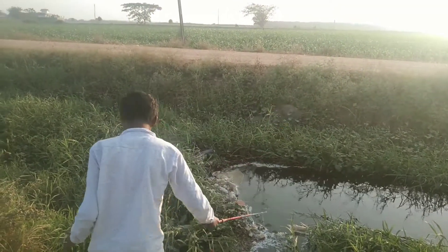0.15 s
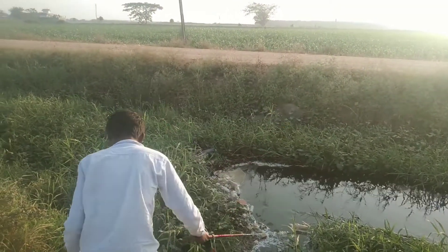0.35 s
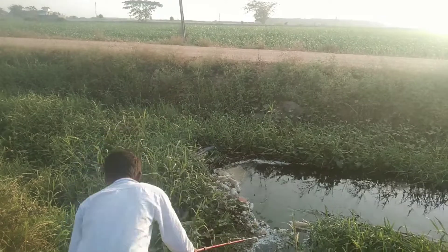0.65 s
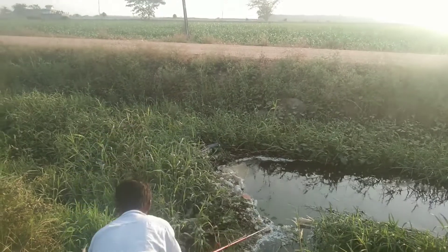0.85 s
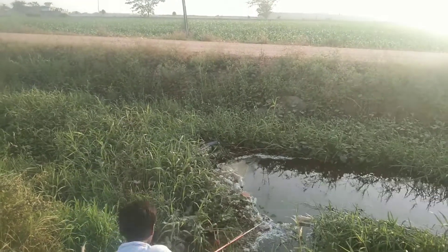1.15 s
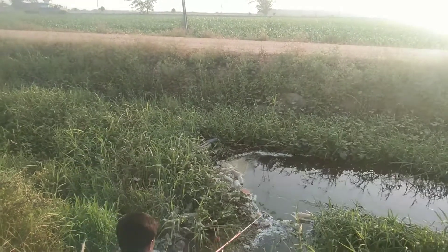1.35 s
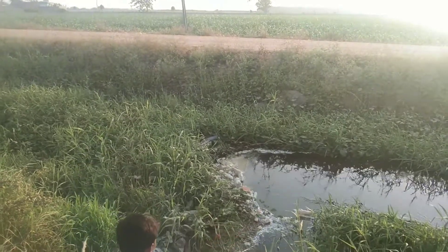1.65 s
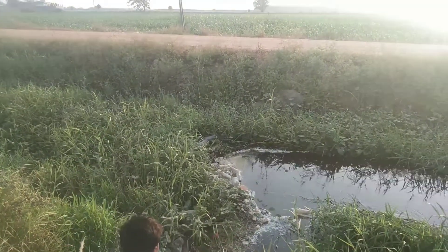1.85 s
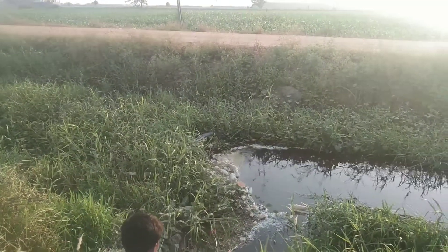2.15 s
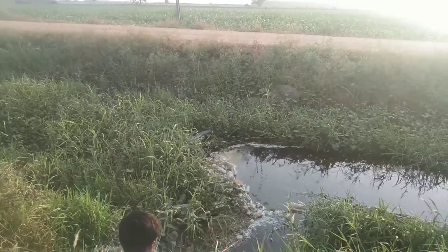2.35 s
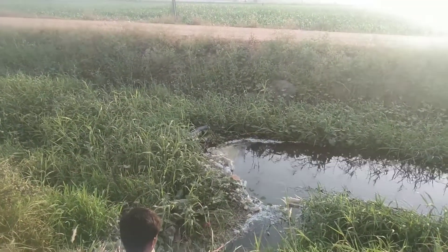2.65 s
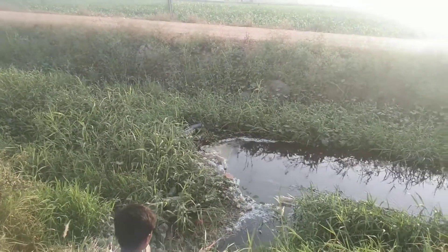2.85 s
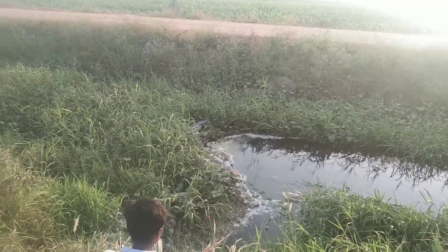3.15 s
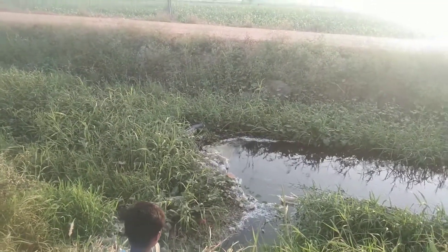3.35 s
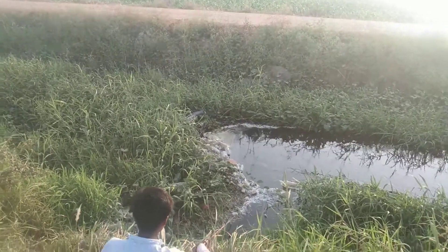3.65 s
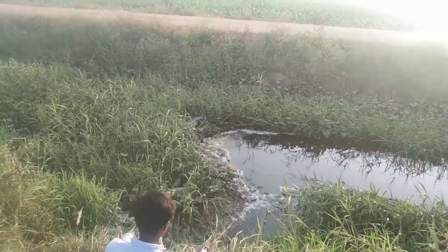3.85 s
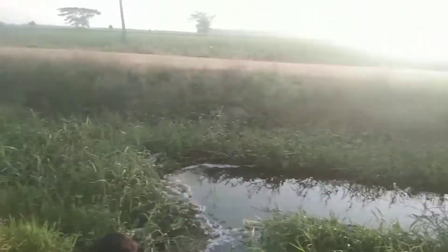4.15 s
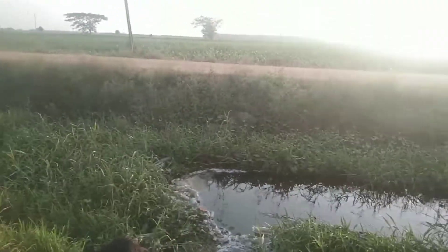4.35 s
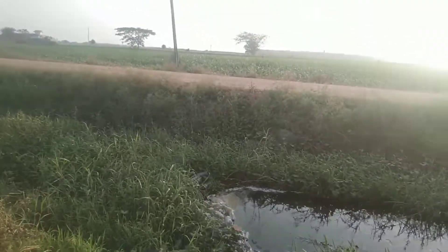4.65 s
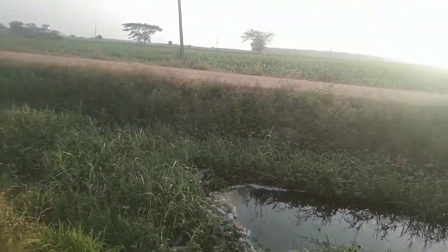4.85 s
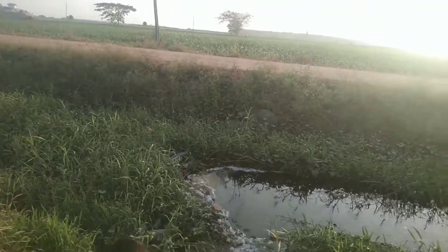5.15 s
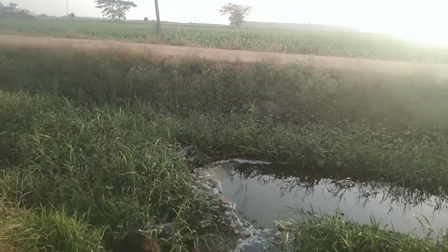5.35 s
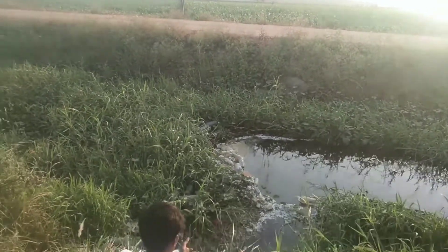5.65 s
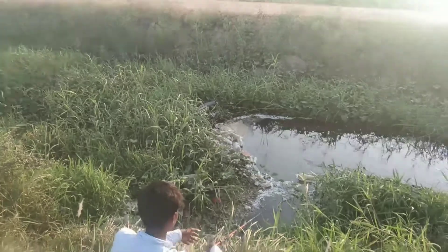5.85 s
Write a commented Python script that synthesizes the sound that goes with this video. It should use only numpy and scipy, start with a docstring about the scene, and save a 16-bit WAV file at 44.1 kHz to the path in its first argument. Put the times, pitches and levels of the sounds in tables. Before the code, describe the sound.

Close footsteps swish and crunch in long grass as a motorcycle putters into the distance, with insects trilling and water trickling.

```python
"""A single-cylinder motorcycle thumps away along a country road, slowly gathering speed as it fades.
Each firing booms in the silencer, rasps out of the pipe and sets metal parts ticking and ringing.
Close by, someone moves about on a grassy bank, brushing blades and snapping stalks; water trickles
into a pond, insects trill, a bird chirps. There are a few soft bumps, a faint metallic ding, and at
the end a double knock with a crunch of dry stalks."""
import sys
import numpy as np
from scipy import signal
from scipy.fft import rfft, irfft
from scipy.io import wavfile
from scipy.ndimage import uniform_filter1d

SR = 44100
rng = np.random.default_rng(int(sys.argv[2]) if len(sys.argv) > 2 else 0)


def transcribe(u):
    """Save the signal u as a 16-bit wav file named by the first command-line argument.

    u: samples, shape (n,) or (channels, n), limited to [-1, 1]; the rate is SR.
    q: integer samples, one column per channel.
    """
    v = np.clip(np.atleast_2d(u).T, -1, 1)
    q = np.round(v * 32767).astype(np.int16)
    wavfile.write(sys.argv[1], SR, q)


N = 264600
T = np.arange(N) / SR


def undb(db):
    """Decibels to gain."""
    return 10 ** (np.asarray(db) / 20)


def unit(x):
    """Scale to rms 1."""
    return x / np.sqrt(np.mean(x ** 2))


def curve(rows):
    """Join (seconds, value) rows by straight lines."""
    return np.interp(T, *np.transpose(rows))


def swell(s, rise_s, fall_s):
    """A rounded crest at s."""
    return np.exp(-.5 * np.minimum(abs(T - s) / np.where(T < s, rise_s, fall_s), 10) ** 2)


def noise():
    """White noise."""
    return rng.standard_normal(N)


def wander(rate_hz):
    """Smooth random drift; rms 1."""
    hold = int(SR / rate_hz)
    stairs = np.repeat(rng.standard_normal(N // hold + 1), hold)
    return unit(uniform_filter1d(uniform_filter1d(stairs, hold), hold)[:N])


def grains(per_s, size=N):
    """Dense tiny clicks of uneven size; rms 1."""
    return unit((rng.random(size) < per_s / SR) * rng.standard_normal(size))


def colour(x, points, tilt_db=0, low_hz=10):
    """Equalise by (Hz, dB) points, a tilt per octave and a low cut; rms 1."""
    f = np.maximum(np.fft.rfftfreq(len(x), 1 / SR), 1)
    hz, db = np.transpose(points)
    gain = undb(np.interp(np.log(f), np.log(hz), db) + tilt_db * np.log2(f))
    return unit(irfft(rfft(x) * gain / np.hypot(1, (low_hz / f) ** 3), len(x)))


def band(hz, width_hz, drive=1):
    """Noise, pushed by a drive, in one steep resonance; rms 1."""
    b, a = signal.iirpeak(hz, hz / width_hz / 1.5, fs=SR)
    return unit(signal.lfilter(b, a, signal.lfilter(b, a, noise() * drive)))


def ring(hz, decay_s, contact_s=1e-5):
    """A struck resonance; a longer contact rounds its attack."""
    t = T[:int(10 * decay_s * SR) + 2]
    return (1 - np.exp(-t / contact_s)) * np.exp(-t / decay_s) * np.sin(2 * np.pi * hz * t)


def add(out, s, sound):
    """Mix a sound in, starting at s."""
    i = max(int(s * SR), 0)
    out[i:i + len(sound)] += sound[:max(N - i, 0)]


def distance_db(absorb_db_per_m, nearest_s=-1.01, road_m=10.5, speed_m_s=8.3):
    """The bike's drop in level since its nearest point: spreading, and absorption along the ground."""
    metres = np.hypot(road_m, speed_m_s * (T - nearest_s))
    return -20 * np.log10(metres / road_m) - absorb_db_per_m * (metres - road_m)


def exhaust(fired, nearest_db=-30.5, scatter_db=1.0):
    """Each firing makes the silencer's chambers swell and ring for a few cycles."""
    # Silencer resonances. Each row: pitch in Hz, swell time constant in seconds, relative gain in dB.
    chambers = [(148, 0.0032, 10.5), (109.3, 0.0027, -37), (76, 0.0049, -5.5), (275, 0.0014, -6.5),
                (158.6, 0.011, -28)]
    t = T[:SR // 8]
    thump = sum(-undb(db) * (t / swell_s) ** 4 * np.exp(-t / swell_s) * np.sin(2 * np.pi * hz * t)
                for hz, swell_s, db in chambers)
    beats = signal.fftconvolve(fired * undb(scatter_db * noise()), thump)[:N]
    return unit(beats) * undb(nearest_db + distance_db(absorb_db_per_m=0.2344))


def clatter(cycle, level_db=-45.5, steady=0.42, rear_db=2.5, turn_s=0.63):
    """Gas rasps once a cycle over chain and tyre noise, carrying better as the pipe turns our way."""
    # Tone of the rasp. Each row: frequency in Hz, gain in dB.
    rasp_eq = [(200, 1.5), (350, 1), (580, -1), (740, 1), (900, -8), (1550, -25), (2300, -6.5),
               (3300, -13.5), (4400, -9.5), (6600, -9), (8500, -23.5), (12500, -40.5), (15000, -37)]
    lead, rise, fall = 0.011, 0.094, 0.19  # in engine cycles
    phase = (cycle + lead) % 1
    puffs = (1 - np.exp(-phase / rise)) * np.exp(-phase / fall) * undb(2 * wander(18))
    rasp = colour(grains(14000) * (steady + puffs), rasp_eq)
    facing_db = rear_db * (1 - 2 * np.exp(-T / turn_s))
    return rasp * undb(level_db + facing_db + distance_db(absorb_db_per_m=0.07))


def casing(cycle, lag_cycles=.1, decay_cycles=0.52):
    """Fins and covers are jolted once a cycle and ring on, each heard best from one angle."""
    # Ringing parts. Each row: pitch and width in Hz, level in dB, loudest moment and spread in seconds.
    parts = [(1165, 300, -56.5, 0.081, 0.71), (2670, 790, -56.5, 0.57, 0.39), (733, 26, -55.5, 0.57, 0.31),
             (1895, 184, -62, 1.63, 1.4), (2186, 67, -63.5, 2.53, 0.78), (560, 254, -59, 2.6, 2.08)]
    jolt = .25 + np.exp(-((cycle - lag_cycles) % 1) / decay_cycles)
    return sum(band(hz, width, jolt) * undb(db) * swell(s, spread, spread)
               for hz, width, db, s, spread in parts)


def cover_ping(fired, hz=2190, lag_s=.004, level_db=-52.0, uneven_db=6, loudest_s=2.2, spread_s=0.84):
    """One thin cover rings out cleanly on each firing, best heard from behind the bike."""
    out = np.zeros(N)
    for s in T[fired > 0]:
        detune, accent = rng.uniform(-1, 1, 2)
        ping = ring(hz * (1 + .025 * detune), decay_s=0.0085, contact_s=.002)
        add(out, s + lag_s, ping * undb(level_db + uneven_db * accent))
    return out * swell(loudest_s, spread_s, spread_s)


def valves(fired, start_db=-39.5, fade_db_per_s=11, uneven_db=4, ticks=7):
    """Uneven flurries of small metallic ticks with each firing, lost as the bike draws away."""
    out = np.zeros(N)
    for s in T[fired > 0]:
        force_db = start_db - fade_db_per_s * s + uneven_db * rng.uniform(-1, 1)
        for hz, lag_s, db in rng.uniform((2300, -.001, -6), (5200, .02, 4), (ticks, 3)):
            add(out, s + lag_s, ring(hz, decay_s=0.0014, contact_s=.00015) * undb(force_db + db))
    return out


def road_hiss(start_db=-72, fade_db_per_s=3.0):
    """The thin top of the tyre noise sinks steadily with distance."""
    hiss = colour(noise(), [(5000, -22), (8500, -2), (10500, 2), (12500, -5.0), (15000, -0.5)])
    return hiss * undb(start_db - fade_db_per_s * T)


def pondside(level_db=-55):
    """Trickling water and open air, with narrow bands of distant drone and insects."""
    # Tone of the water and air. Each row: frequency in Hz, gain in dB.
    bed_eq = [(25, -34), (70, 10.5), (110, 17), (220, 4.5), (420, -4), (700, 1), (950, -3), (1200, -1.5),
              (1900, -8), (3000, -13.5), (5000, -10.5), (7000, -19), (9300, -32), (12500, -56),
              (15000, -32)]
    # Steady drones. Each row: centre and width in Hz, level in dB.
    drones = [(737, 46, -64.5), (559, 117, -66.5), (1174, 100, -73.5), (1568, 210, -71), (7080, 200, -70.5)]
    bed = colour(grains(9000), bed_eq, low_hz=30) * undb(level_db + .5 * wander(5.7))
    return bed + sum(band(hz, width) * undb(db + 1.5 * wander(14)) for hz, width, db in drones)


def stirring(rest_db=-68):
    """How strongly the long grass is brushed, as a gain."""
    # Slow brushes. Each row: crest and spread in seconds, level in dB.
    brushes = [(.63, 0.087, -52.5), (1.68, 0.15, -61), (2.33, 0.067, -58.5), (2.95, 0.12, -63.5),
               (3.28, 0.052, -62), (3.8, 0.18, -56), (4.95, 0.17, -59), (5.47, 0.22, -58.5),
               (5.98, .08, -59)]
    power = sum((undb(db) * swell(s, spread, spread)) ** 2 for s, spread, db in brushes)
    return np.sqrt(undb(rest_db) ** 2 + power)


def grass_rustle(flutter_db=2.2):
    """Blades rub all the time in a fluttering hiss that lifts with each brush."""
    # Tone of rubbing blades. Each row: frequency in Hz, gain in dB.
    rub_eq = [(1000, -13), (3000, -1.5), (5000, 0), (6600, 12), (7400, 3), (9000, -16), (12500, -35),
              (15000, -23)]
    flutter = undb(flutter_db * wander(45))
    return colour(grains(6000), rub_eq) * stirring() * flutter


def grass_steps(fall_ratio=1.46, echo_s=.003, echo_db=-7):
    """Each step crushes a burst of blades; a close reflection hollows the swish a little."""
    # Steps and swishes. Each row: crest and rise in seconds, level in dB, tilt in dB per octave,
    # low cut in Hz.
    swishes = [(0.031, 0.074, -51.5, -6, 730), (.837, .018, -40, -3, 250), (0.887, 0.0076, -42, -2.5, 250),
               (.978, .011, -46.5, 2, 400), (1.024, .015, -43, -1.5, 400),
               (1.33, 0.00089, -41.5, -4.5, 1800), (1.668, 0.02, -46.5, -3, 300),
               (2.555, .022, -53, -2, 300), (3.695, 0.036, -49.5, -6, 400), (3.843, 0.023, -51, -5, 380),
               (4.31, .04, -57, -3, 500), (5.078, .0025, -47, -4, 1000), (5.116, 0.018, -40.5, -4.5, 1100),
               (5.898, .011, -39.5, -1.5, 297)]
    # Tone of crushed grass. Each row: frequency in Hz, gain in dB.
    crush_eq = [(150, -14.5), (450, 9), (800, 2.5), (1500, 2.5), (2400, 5), (3500, 1.5), (6600, 6),
                (7600, -4), (9000, -22), (12500, -29), (15000, -30)]
    steps = np.zeros(N)
    for s, rise_s, db, tilt_db, low_hz in swishes:
        near = abs(T - s) < .5
        burst = colour(grains(5000, size=near.sum()), crush_eq, tilt_db, low_hz)
        steps[near] += burst * swell(s, rise_s, rise_s * fall_ratio)[near] * undb(db)
    steps *= undb(1.8 * wander(220))  # the blades catch and slip
    return steps + undb(echo_db) * np.interp(T - echo_s, T, steps)


def crackle(per_s=70, above_rustle_db=6, uneven_db=5):
    """Small dry blades tick here and there, louder when the grass is stirred."""
    out, stir = np.zeros(N), stirring()
    for s, hz, accent in rng.uniform((0, 3200, -1), (T[-1], 7000, 1), (int(per_s * T[-1]), 3)):
        tick = ring(hz, decay_s=0.0017, contact_s=0.00033)
        add(out, s, tick * stir[int(s * SR)] * undb(above_rustle_db + uneven_db * accent))
    return out


def sizzle(start_s=0.51, end_s=0.72, level_db=-62):
    """A thin, very high hiss swells briefly."""
    envelope = curve([(start_s - .04, 0), (start_s + .05, 1), (end_s, 1), (end_s + .015, 0)])
    hiss = colour(noise(), [(5000, -20), (8000, -10), (10500, 8.5), (12500, -4), (15000, 4)])
    return hiss * envelope * undb(level_db)


def insects(chirp_depth=0.57, stroke_hz=125, fade_s=0.032):
    """Narrow, shrill trills of quick wing strokes, grouped into slightly uneven chirps."""
    # Songs. Each row: start and end in seconds, pitch and width in Hz, chirps per second, level in dB.
    songs = [(1.0, 2.454, 8600, 260, 6.9, -74.5), (1.607, 2.602, 6520, 480, 9, -58),
             (2.573, 4.8, 8090, 200, 5.5, -70), (3.077, 5.1, 7550, 350, 5.1, -69),
             (4.602, 5.906, 8010, 400, 4.3, -68.5), (4.3, 6, 7150, 220, 8, -66.5),
             (4.7, 5.804, 4420, 600, 13.6, -65)]
    out = np.zeros(N)
    for start, end, hz, width, rate, db in songs:
        loose_time = np.cumsum(1 + 0.1537 * wander(3.87)) / SR
        chirps = np.clip(0.77 + chirp_depth * np.sin(2 * np.pi * rate * loose_time), 0, 1)
        strokes = 1 + .7 * np.sin(2 * np.pi * stroke_hz * loose_time)
        singing = np.clip(np.minimum(T - start, end - T) / fade_s, 0, 1)
        out += band(hz, width) * chirps * strokes * singing * undb(db)
    return out


def stalk_snaps(decay_cycles=2):
    """Single stalks break underfoot, each with a tiny pitched click."""
    # Snaps. Each row: start in seconds, strength in dB, pitch in Hz.
    snaps = [(2.012, -43, 13500), (2.033, -41, 13500), (3.677, -43, 13000), (5.1206, -36, 3000),
             (5.143, -32, 2400), (5.228, -36.5, 1500), (5.8868, -19, 6140)]
    out = np.zeros(N)
    for s, db, hz in snaps:
        add(out, s, undb(db) * ring(hz, decay_cycles / hz, contact_s=.5 / hz))
    return out


def bird(s=2.538, spread_s=0.0048, level_db=-45):
    """One short rising chirp."""
    hz = curve([(s - spread_s, 3350), (s + spread_s / 2, 3780)])
    envelope = np.exp(-.5 * ((T - s) / spread_s) ** 2)
    return np.sin(2 * np.pi * np.cumsum(hz) / SR) * envelope * undb(level_db)


def knocks(click_db=-9, click_hz=1100):
    """Dull bumps at the microphone; the higher, harder ones have a stronger contact click."""
    # Bumps. Each row: start in seconds, strength in dB, pitch in Hz, decay in seconds.
    bumps = [(2.942, -35, 103, 0.01), (2.978, -34, 87.5, 0.016), (4.114, -39, 83, 0.025),
             (5.874, -23, 298, 0.0025), (5.8776, -18, 280, 0.00079)]
    out = np.zeros(N)
    for s, db, hz, decay_s in bumps:
        thud = signal.lfilter(*signal.butter(1, hz / 3, "high", fs=SR), ring(hz, decay_s))
        hardness = (hz / 280) ** 2
        add(out, s, -undb(db) * thud)
        add(out, s, -undb(db + click_db) * hardness * ring(click_hz, decay_s=0.00055))
    return out


def metal_ding():
    """Two light touches set a small piece of metal ringing."""
    # Touches. Each row: start in seconds, strength in dB.
    taps = [(4.033, -58), (4.122, -56.5)]
    # Modes of the metal. Each row: pitch in Hz, relative level in dB, seconds to die away by 60 dB.
    modes = [(3478, 0, .5), (3090, -10, .4), (3860, -6, .15)]
    out = np.zeros(N)
    for s, force_db in taps:
        for hz, db, t60 in modes:
            add(out, s, undb(force_db + db) * ring(hz, t60 / np.log(1000), contact_s=0.0033))
    return out


def crunch(s=5.897, level_db=-34.5):
    """Dry stalks splinter brightly right by the microphone."""
    eq = [(3000, -13), (4800, -4.5), (6300, 3.5), (7300, -8), (9000, -26), (12500, -31), (15300, -20)]
    splinters = colour(grains(4000), eq, low_hz=600)
    return splinters * swell(s, rise_s=0.0092, fall_s=0.016) * undb(level_db)


def scene():
    """The bike and everything nearby, in one channel."""
    # Engine speed, with a throttle blip half-way. Each row: time in seconds, firings per second.
    firing_rate = [(0.0, 14.7), (0.6, 15.9), (1.05, 15.88), (1.3, 16.57), (1.55, 16.21), (1.8, 16.83),
                   (3.0, 17.37), (3.3, 17.14), (3.65, 18.9), (3.95, 18.31), (4.6, 18.95), (6.0, 19.36)]
    cycle = .352 + np.cumsum(curve(firing_rate)) / SR  # a firing at each whole number
    fired = np.diff(np.floor(cycle), prepend=0)
    engine = exhaust(fired) + clatter(cycle) + casing(cycle) + cover_ping(fired) + valves(fired)
    bike = engine + road_hiss()
    grass = grass_rustle() + grass_steps() + crackle() + stalk_snaps() + crunch()
    nearby = grass + sizzle() + knocks() + metal_ding()
    return (bike + nearby + pondside() + insects() + bird())[None]


def record(dry, low_hz=38, top_hz=15550):
    """The small microphone loses the deepest bass, and the recorder cuts the top."""
    thin = signal.sosfilt(signal.butter(2, low_hz, "high", fs=SR, output="sos"), dry)
    return signal.sosfilt(signal.ellip(10, .2, 70, top_hz, fs=SR, output="sos"), thin)


dry = scene()
out = record(dry)
transcribe(out)
```